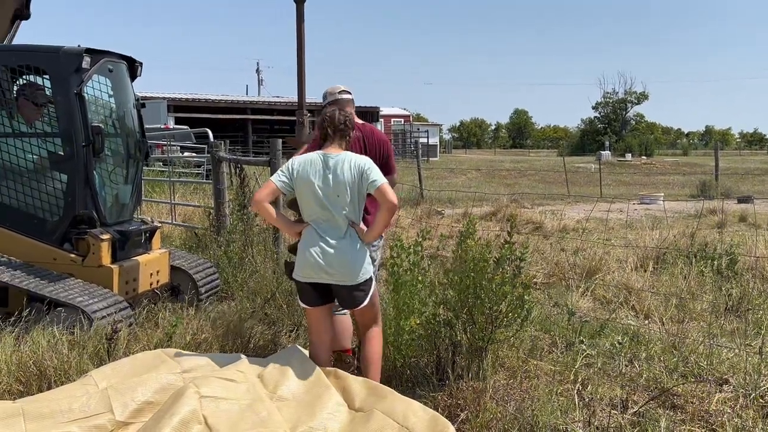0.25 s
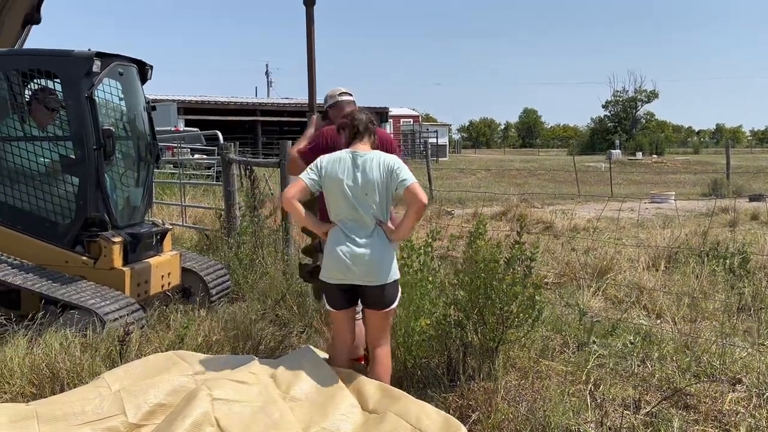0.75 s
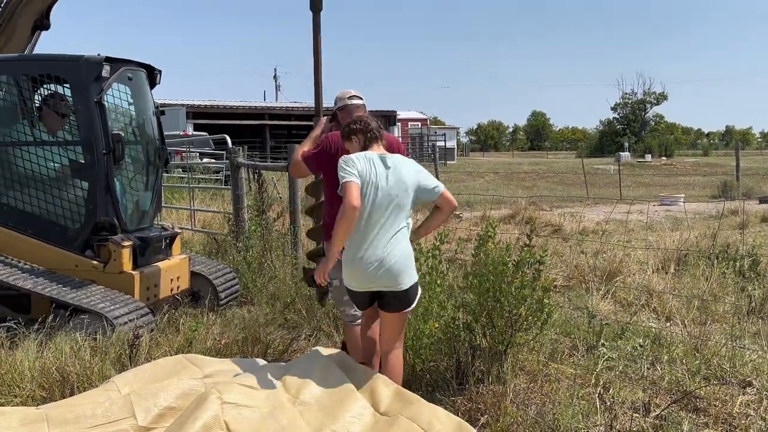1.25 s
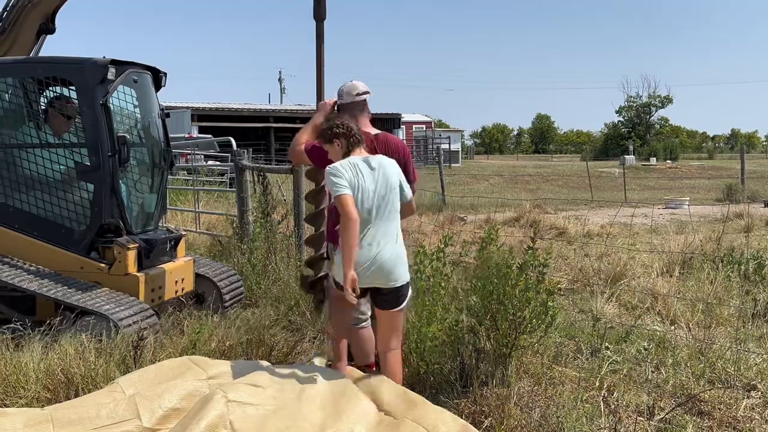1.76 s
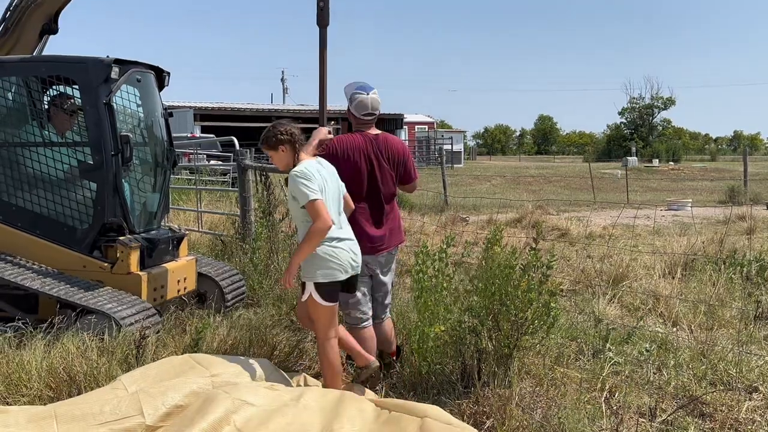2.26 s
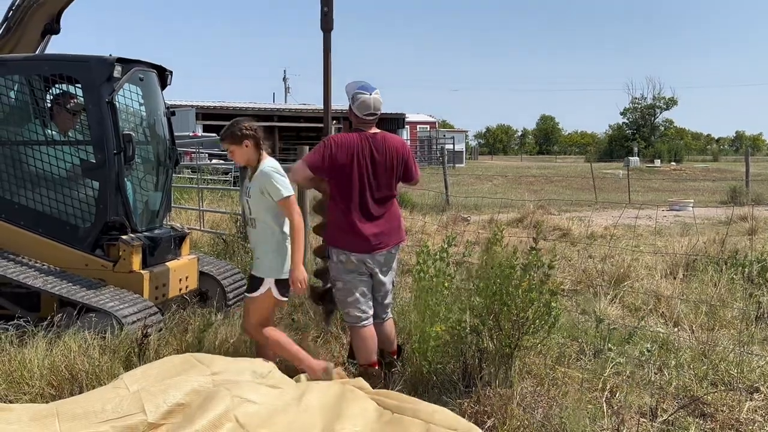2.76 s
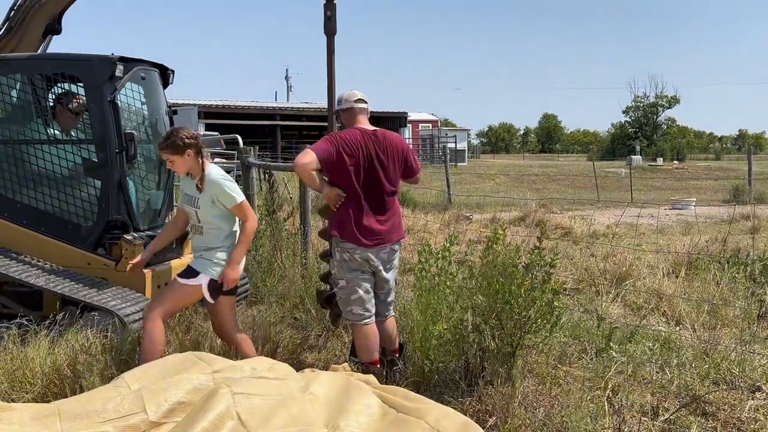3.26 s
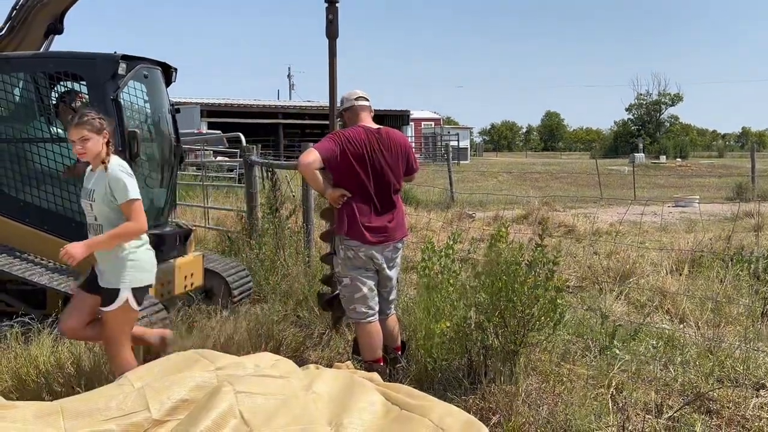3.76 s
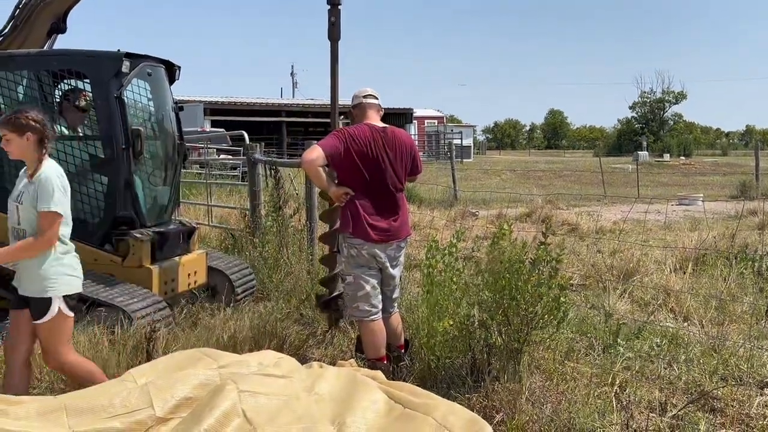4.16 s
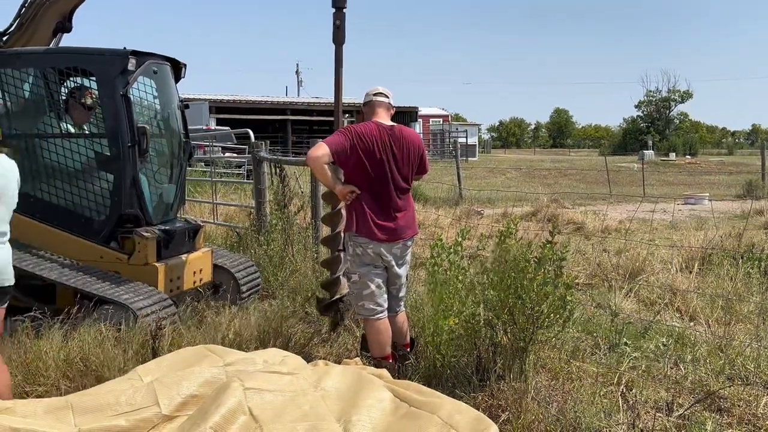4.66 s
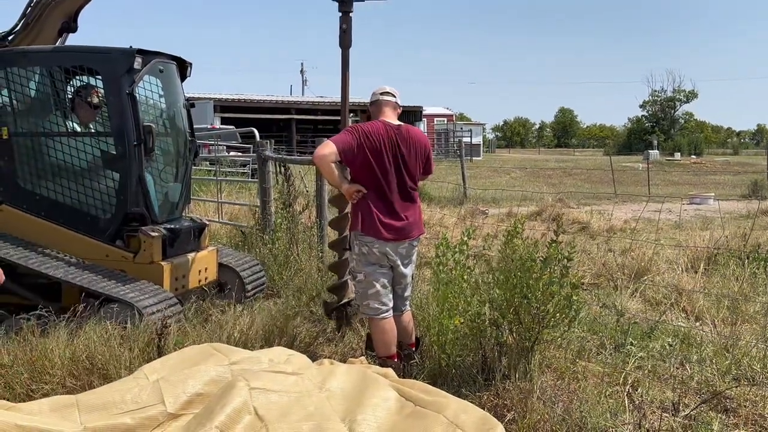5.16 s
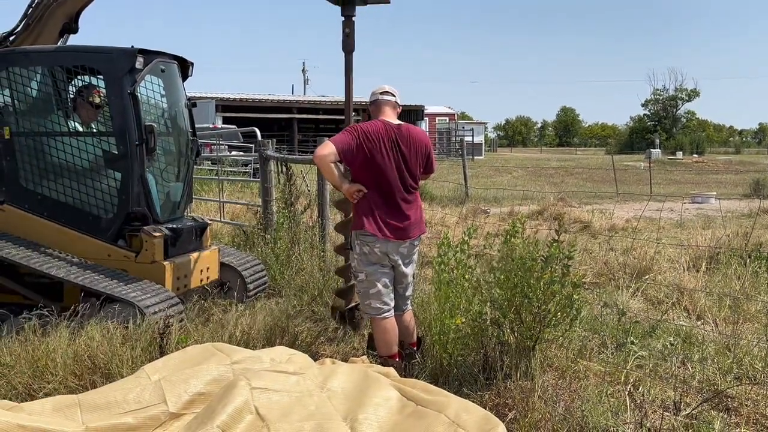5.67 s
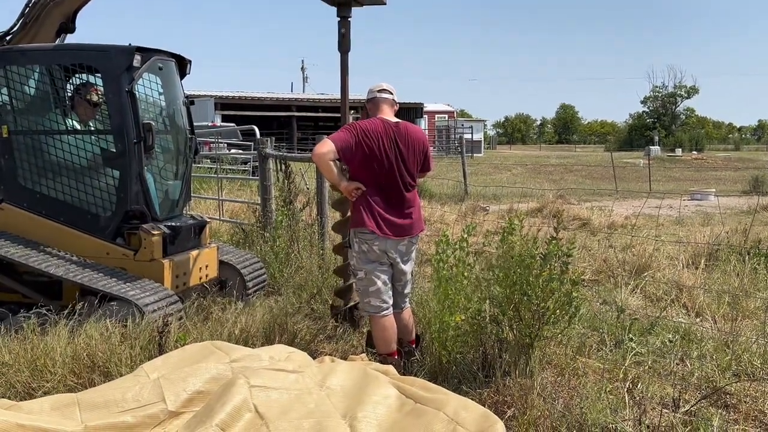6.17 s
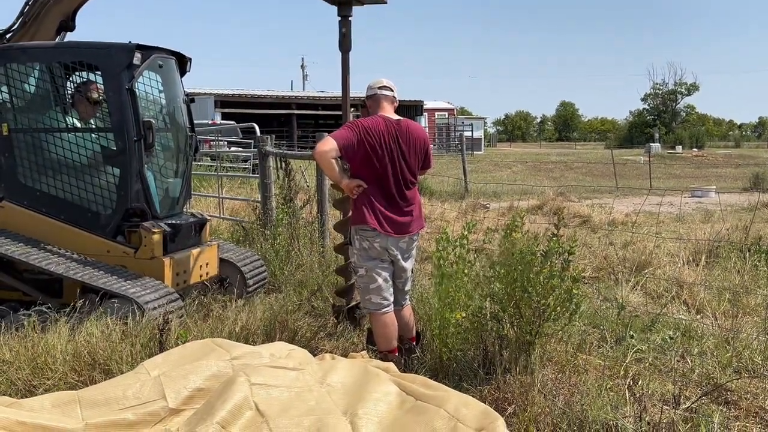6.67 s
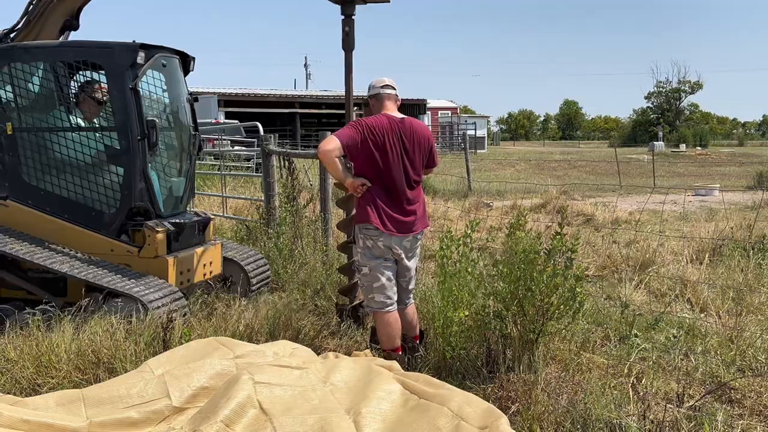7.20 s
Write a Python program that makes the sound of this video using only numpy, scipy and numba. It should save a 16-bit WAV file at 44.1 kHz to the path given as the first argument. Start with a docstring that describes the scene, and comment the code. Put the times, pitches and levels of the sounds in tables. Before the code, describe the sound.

Outdoors, a fast-running diesel loader drones and whines, dips and labours as its auger bites, then recovers, with buffeting wind and a late microphone thump.

```python
"""In an open pasture, a tracked loader's four-cylinder diesel runs at full throttle, left of a camera, as its auger bores.
Tones and noise locked to the crank make the engine; it sags at the bite and its low hum swells late.
A fan tone follows the speed sluggishly and beats against the engine's sixth order.
Bursts of noise crackle as steps in dry grass; low noise and decaying puffs make wind at the microphone.
A hard thump falls near the end, and a limiter ducks under the strongest peaks."""
import sys
import numpy as np
from scipy import signal
from scipy.fft import rfft, irfft, next_fast_len
from scipy.io import wavfile
from scipy.ndimage import uniform_filter1d, minimum_filter1d, map_coordinates
from numba import njit

SR = 44100
rng = np.random.default_rng(int(sys.argv[2]) if len(sys.argv) > 2 else 0)


def wav_record(signal):
    """Record a signal, one row per channel, as 16-bit PCM in the file named by sys.argv[1]."""
    frames = np.transpose(np.atleast_2d(signal))
    bounded = np.clip(frames, -1, 1)
    # unit amplitude maps onto the largest positive 16-bit level
    quanta = np.round(bounded * 32767).astype(np.int16)
    wavfile.write(sys.argv[1], SR, quanta)


N = 328045

# spectrum of turbulence at the microphone, for churn and buffets: (frequency [Hz], relative level [dB])
TURBULENCE = [(25, -40), (60, -8), (110, -1), (180, -2.5), (270, -7.5), (380, -12), (600, -34), (1500, -88)]


def amp(db):
    """Level definition: decibels become an amplitude ratio."""
    return 10 ** (np.asarray(db) / 20)


def unit(x):
    """Normalisation: the signal is scaled to rms 1."""
    return x / np.sqrt(np.mean(x ** 2) + 1e-20)


def along(points, hz):
    """Interpolation on a logarithmic frequency axis, from (frequency [Hz], value) points."""
    f, v = np.transpose(points)
    return np.interp(np.log(hz + 1), np.log(f + 1), v)


def curves(rows):
    """Linear interpolation in time: one value per sample for each column after the time."""
    s, *cols = np.transpose(rows)
    return [np.interp(np.arange(N) / SR, s, c) for c in cols]


def wobble(rate):
    """Band-limited randomness: a smooth curve through random knots, rate of them a second."""
    knots = rng.standard_normal(int(N * rate / SR) + 4)
    return map_coordinates(knots, [np.arange(N) * rate / SR])


def swells(rows):
    """Gaussian envelopes, summed from (time [s], level [dB], 1/e half length [s]) rows."""
    t = np.arange(N) / SR
    return sum(amp(db) * np.exp(-((t - s) / half) ** 2) for s, db, half in rows)


def filtered(x, response):
    """Linear filtering: the spectrum is multiplied by a complex response of frequency."""
    m = next_fast_len(N + 8192)
    return irfft(rfft(x, m) * response(np.fft.rfftfreq(m, 1 / SR)), m)[..., :N]


def coloured(x, spectrum):
    """Spectral shaping: the sound is filtered by a level curve, then set to rms 1."""
    return unit(filtered(x, lambda hz: amp(along(spectrum, hz))))


def pair(apart_db):
    """Partial coherence: white stereo noise with a shared part and a part of each port's own."""
    shared = rng.standard_normal(N)
    own = amp(apart_db) * rng.standard_normal((2, N))
    return unit(shared + own)


def wind(lumps_db, churn_lumps_db):
    """Turbulent pressure at the ports: a lumpy deep rumble, and a higher churn, both rising with gusts."""
    # gusts: (time [s], level [dB], 1/e half length [s])
    gust_rows = [(.27, -10, 0.26), (.85, -16, 0.27), (1.58, -18.5, 0.26), (3.9, -21.5, 1),
                 (5.95, -19, 0.22), (6.45, -9, 0.18), (6.87, -15, .07), (7.3, -22, 0.076)]
    # deep rumble: (frequency [Hz], relative level [dB])
    rumble_spectrum = [(20, -43), (35, -9.5), (52, 5), (80, 4), (120, -2.5), (180, -10), (260, -20),
                       (400, -21), (800, -36), (2000, -89)]
    rumble_db, churn_db = -18, -33  # steady wind, between gusts
    gust_share = 0.54  # of a gust's amplitude that reaches the rumble
    gust = swells(gust_rows)
    rumble = unit(amp(lumps_db * wobble(22)) * coloured(pair(apart_db=1), rumble_spectrum))
    churn = unit(amp(churn_lumps_db * wobble(30)) * coloured(pair(apart_db=-6), TURBULENCE))
    return (amp(rumble_db) + gust_share * gust) * rumble + (amp(churn_db) + gust) * churn


def buffets():
    """Eddy impact: each eddy that strikes the ports is a short low puff of pressure."""
    # single buffets: (time [s], level [dB])
    buffet_rows = [(0.039, -8), (.245, -10.5), (0.681, -10.5), (.76, -14), (.835, -9.5), (0.956, -14.5),
                   (1.031, -10), (1.385, -11), (1.5, -9.5), (1.574, -3), (1.801, -5), (2.48, -12),
                   (2.894, -9), (3.58, -7.5), (3.8, -8.5), (4.045, -10.5), (4.615, -10.5), (6.532, -4.5)]
    half_s = 0.015  # 1/e half length of every puff
    eddies = coloured(pair(apart_db=-8), TURBULENCE)
    out = np.zeros((2, N))
    for s, db in buffet_rows:
        bell = swells([(s, 0, half_s)])
        bell_rms = np.sqrt(np.mean(bell ** 2))
        out += amp(db) * unit(bell * eddies) * bell_rms
    return out


def thump():
    """Modal superposition: one hard thump on the microphone sounds as low modes under a short bell."""
    # the blow, a single row: (time [s], 1/e half length [s])
    blow = (7.086, 0.0067)
    # low modes: (frequency [Hz], level at the left port [dB])
    modes = [(155, 7), (265, 3.5), (390, -7)]
    s, half = blow
    t = np.arange(N) / SR - s
    ringing = sum(swells([(s, db, half)]) * np.sin(2 * np.pi * hz * t) for hz, db in modes)
    return amp([[0], [-3]]) * ringing  # left, right


def grass(spiky_db):
    """Crackling noise: dry stalks give many small random spikes, in clumps under each step."""
    # steps and rustles: (time [s], level [dB], 1/e half length [s])
    step_rows = [(.34, -38.5, 0.062), (1.005, -38.5, 0.016), (1.22, -38, 0.047), (1.93, -35, 0.048),
                 (2.12, -40, 0.14), (3.37, -35, .1), (4.15, -38, .09), (4.85, -41, 0.046)]
    # crackle: (frequency [Hz], relative level [dB])
    grass_spectrum = [(800, -3), (2500, 6.5), (5000, 1), (8000, 5.5), (11000, -7.5), (15800, -5.5)]
    spikes_and_clumps_db = spiky_db * wobble(900) + 3.5 * wobble(45)
    crackle = unit(pair(apart_db=-4) * amp(spikes_and_clumps_db))
    return swells(step_rows) * coloured(crackle, grass_spectrum)


def lagging(x, lag_s):
    """First-order lag: the curve as something with inertia follows it."""
    keep = np.exp(-1 / (lag_s * SR))
    return signal.lfilter([1 - keep], [1, -keep], x)


def fan(load, waver_db, drift_hz):
    """Blade-passing tone: the cooling fan whines at its blade rate and follows the load only sluggishly."""
    free_hz, sag_hz, lag_s = 424.3, 6.8, .9  # blade rate running free, its drop at full load, time constant
    level_db = -16.5
    blade_hz = free_hz - sag_hz * lagging(load, lag_s)
    blades_passed = np.cumsum(blade_hz + drift_hz * wobble(9)) / SR
    return np.sqrt(2) * amp(level_db + waver_db * wobble(15)) * np.sin(2 * np.pi * blades_passed)


def crank(load):
    """Phase accumulation: firings counted from the start; load drags the speed, the governor hunts a little."""
    free_hz, sag_hz = 68.88, 3.42  # firing rate running free, its drop at full load
    firing_hz = free_hz - sag_hz * load + .08 * wobble(12)
    return np.cumsum(firing_hz) / SR


def exhaust(firings, labour, hum_waver_db):
    """Fundamental of a pulse train: one cycle for every firing, swelling as the engine labours."""
    free_db, loaded_db = -15, -6
    hum_db = free_db + (loaded_db - free_db) * labour
    return np.sqrt(2) * amp(hum_db + hum_waver_db * wobble(12)) * np.sin(2 * np.pi * firings)


def orders(firings, load, waver_db):
    """Harmonic series of the engine cycle: load shifts the tones' strengths, and combustion wavers each."""
    # engine tones, and at 9, 35.7 and 45.3 the tones of the nine-piston hydraulic pump it drives: (multiple of
    # the firing rate [to the nearest 1/4], relative level running free [dB], relative level under load [dB])
    order_rows = [(2, -7, -3.5), (3, -20.5, -10.5), (4, -7, -21), (4.5, -17, -4), (5, -35, -9),
                  (6, -1.5, 2.5), (7, -16.5, -17), (7.5, -16.5, -35.5), (8, -20, -20), (8.5, -18, -19.5),
                  (9, -14, -14.5), (10, -29.5, -20), (12, -4, -20.5), (13, -21, -23), (14, -15.5, -17),
                  (14.25, -19, -16.5), (15.75, -20, -20), (17, -28.5, -24), (20.5, -19, -20),
                  (21, -23.5, -16.5), (22, -15, -18.5), (24, -17.5, -31), (30, -22, -35), (31, -20, -34),
                  (35.7, -28, -26), (45.3, -32, -33.5), (68, -41, -38)]
    cylinders = 4
    out = np.zeros(N)
    for order, free_db, loaded_db in order_rows:
        level = amp(free_db) * (1 - load) + amp(loaded_db) * load
        # a whole number of cycles to each round of the cylinders
        cycles = np.round(cylinders * order) * firings / cylinders
        phase = 2 * np.pi * (cycles + rng.random())
        out += level * amp(waver_db * wobble(14)) * np.sin(phase)
    return np.sqrt(2) * out


def knocks(firings, sharp, depth, repeat):
    """Cyclic modulation: white rattle flares at every firing; a share repeats with each turn of the crank."""
    pattern = rng.standard_normal(1024)  # one turn of the crank
    turn = firings / 2 % 1  # two firings to a turn
    same = np.interp(turn * len(pattern), np.arange(len(pattern)), pattern)
    share = np.clip(repeat, 0, 1)
    rattle = np.sqrt(share) * unit(same) + np.sqrt(1 - share) * rng.standard_normal(N)
    return rattle * (1 + depth * np.exp(-sharp * (firings % 1)))


def scattered(x):
    """Scattering: ground and machine partly scramble white sound x on its way to each port."""
    # coherence of the two ports: (frequency [Hz], left-right likeness [0-1])
    likeness = [(100, 0.63), (450, 0.76), (720, 0.74), (900, 0.76), (1600, 0.88), (2200, 0.55),
                (3500, 0.49), (6500, 0.62), (9500, 1), (15000, 1)]
    alike = lambda hz: np.clip(along(likeness, hz), 0, 1)
    direct = filtered(unit(x), lambda hz: np.sqrt(alike(hz)))
    scrambled = filtered(rng.standard_normal((2, N)), lambda hz: np.sqrt(1 - alike(hz)))
    return direct + scrambled


def panels(x):
    """Resonance: each sheet-steel panel lifts the sound around its own frequency."""
    # panel resonances: (centre [Hz], 1/e half width of the lift [Hz], lift [dB])
    panel_rows = [(2270, 71, 0.5), (2840, 60, 3.5), (3340, 46, 3.5), (4600, 150, 2.5), (5040, 62, 2),
                  (5520, 89, 3), (6320, 120, 2), (8400, 130, 0.5)]

    def response(hz):
        lift_db = sum(db * np.exp(-((hz - centre) / width) ** 2) for centre, width, db in panel_rows)
        return amp(lift_db)
    return filtered(x, response)


def from_left(x):
    """Diffraction: the camera body shades and delays the engine differently at its two microphone ports."""
    # phase between the ports: (frequency [Hz], lead of left over right [rad])
    lead = [(60, 0), (170, -.3), (300, .15), (480, .7), (600, 1.5), (690, 1.4), (780, .15), (950, .3),
            (1100, 1.1), (1330, 2.9), (1750, 2.8), (2050, 3.6), (2400, 5.6), (2700, 9.4), (2950, 12.3),
            (3400, 13.8), (4100, 12.2), (5000, 13.8), (7200, 13.7), (8800, 12.2), (10800, 9.4),
            (12200, 9.4), (13200, 6.3)]
    # level between the ports: (frequency [Hz], left minus right [dB])
    tilt = [(60, -0.5), (400, 0.6), (500, -4), (600, 7), (730, 14), (850, 4), (1000, 2), (1250, 2),
            (1800, -1), (2300, -5), (3300, 4.5), (4300, 0.5), (6400, 9.5), (8000, 6), (9800, -2),
            (15000, 3)]

    def ports(hz):
        half = amp(along(tilt, hz) / 2) * np.exp(.5j * along(lead, hz))
        both = np.array([half, 1 / half])
        return both / np.sqrt(np.mean(np.abs(both) ** 2, axis=0))  # mean power of the ports is kept
    return filtered(x, ports)


def loader():
    """Common excitation: hum, tones, clatter and hiss share one crank, with the fan tied to the same load."""
    # pull of the auger, a brief touch and then the long bite: (time [s], load [0-1])
    load_rows = [(.5, 0), (.72, .3), (.95, .03), (1.75, 1), (6.28, 1), (6.5, .3), (6.72, 0)]
    # clatter of the block: (frequency [Hz], relative level [dB])
    block_spectrum = [(60, -34), (180, -10), (290, 3.5), (500, -1), (600, -0.5), (720, -3.5), (820, -1.5),
                      (960, -5), (1120, -9), (1270, -12.5), (1520, -9), (1640, -10.5), (1780, -15),
                      (1920, -18.5), (2600, -51)]
    # hiss of injectors and hydraulics: (frequency [Hz], relative level [dB])
    hiss_spectrum = [(1300, -40), (1850, -5), (2080, 0), (2350, -1.5), (2680, -7.5), (2950, -4.5),
                     (3650, -11), (4500, -8), (5400, -10.5), (6400, -6), (7800, -13), (9400, -12.5),
                     (12200, -18.5), (15800, -20.5)]
    block_db, block_labour_db = -18.5, -1.17  # level running free, change while the engine labours
    hiss_db, hiss_labour_db = -30.5, -.5
    tones_db = -20.5
    labour_delay_s = 0.65
    bite_db = 2.5  # greatest possible surge at the bite

    load, = curves(load_rows)
    t = np.arange(N) / SR
    labour = np.interp(t - labour_delay_s, t, load) ** 2  # builds up late, and only under heavy load
    surge_db = bite_db * np.maximum(load - labour, 0)  # lasts until the engine has taken up the load
    firings = crank(load)

    # the knock is harder when running free
    clatter = knocks(firings, sharp=11.0, depth=1.3 - 0.34 * load, repeat=0.12)
    block = coloured(scattered(clatter), block_spectrum)
    rattle = knocks(firings, sharp=4, depth=.55 - .3 * load, repeat=.15)
    hiss = coloured(panels(scattered(rattle)), hiss_spectrum)

    tones = amp(tones_db) * orders(firings, load, waver_db=1.5)
    body = amp(block_db + block_labour_db * labour) * block + tones
    flutter_db = .7 * wobble(30)  # moving air makes the treble flutter
    treble = amp(hiss_db + hiss_labour_db * labour + flutter_db) * hiss
    hum = exhaust(firings, labour, hum_waver_db=0.22)
    whine = fan(load, waver_db=1.25, drift_hz=0.57)
    return from_left(hum + whine + amp(surge_db) * (body + treble))


def scene():
    """Superposition: wind, thump, steps and loader add in an open field."""
    air = wind(lumps_db=5.5, churn_lumps_db=3.5) + buffets()
    return air + thump() + grass(spiky_db=3) + loader()


@njit
def released(over, fall):
    """Peak holding: jumps up with each peak, then sinks by the factor fall at every sample."""
    out = over.copy()
    for i in range(1, len(out)):
        out[i] = max(over[i], out[i - 1] * fall)
    return out


def limited(x, ceiling_db, release_s):
    """Look-ahead gain control: turns down just before a peak and recovers slowly."""
    peak_db = 20 * np.log10(np.abs(x).max(axis=0) + 1e-9)
    over_db = np.maximum(peak_db - ceiling_db, 0)
    cut_db = released(over_db, np.exp(-1 / (release_s * SR)))
    gain_db = uniform_filter1d(minimum_filter1d(-cut_db, size=129), size=129)
    return x * amp(gain_db)


def record(dry):
    """Limiting and band limitation: the camera limits peaks; the sound clips at full scale and the top band is
    cut."""
    top_hz = 15900
    held = np.clip(limited(dry, ceiling_db=1, release_s=.085), -1, 1)  # ceiling relative to full scale
    return filtered(held, lambda hz: hz < top_hz)


dry = scene()
out = record(dry)
wav_record(out)
```